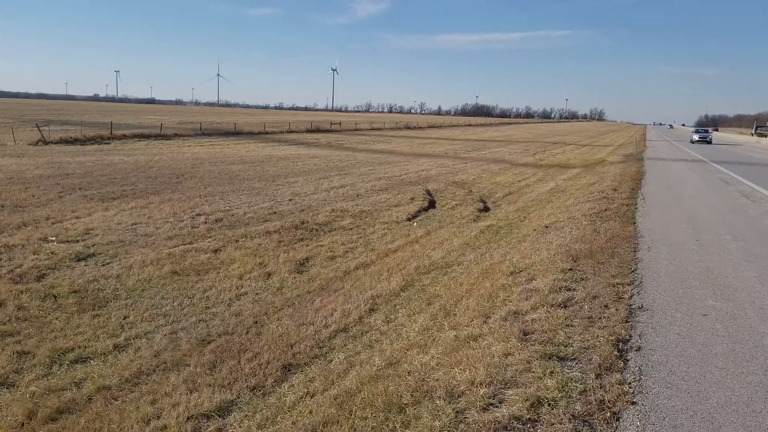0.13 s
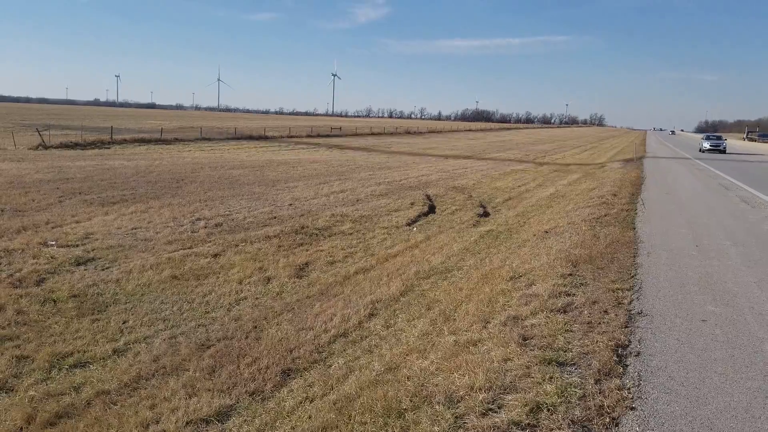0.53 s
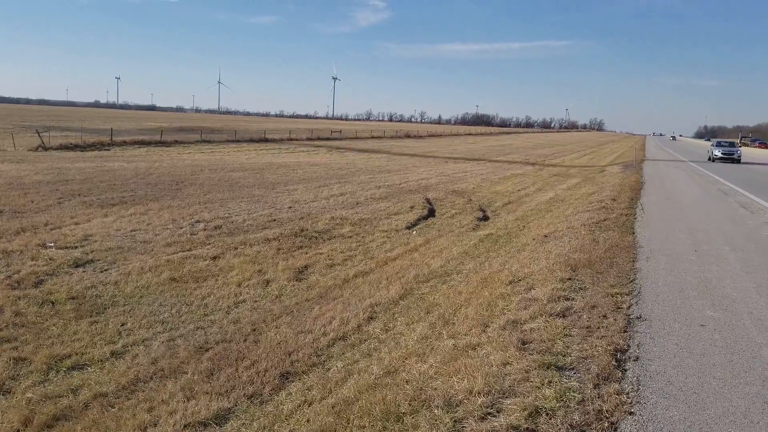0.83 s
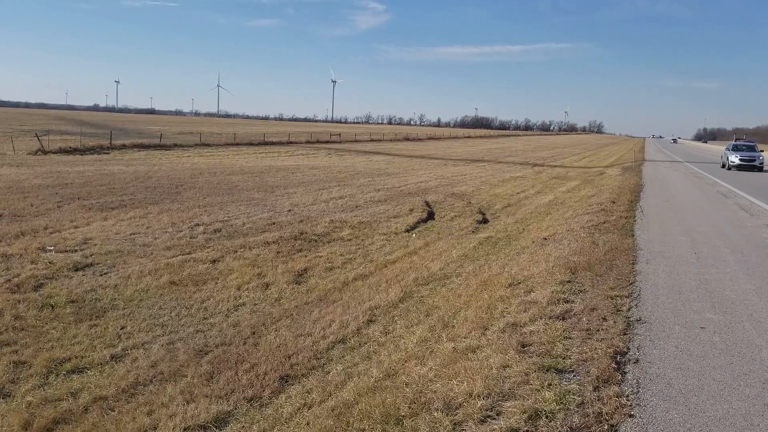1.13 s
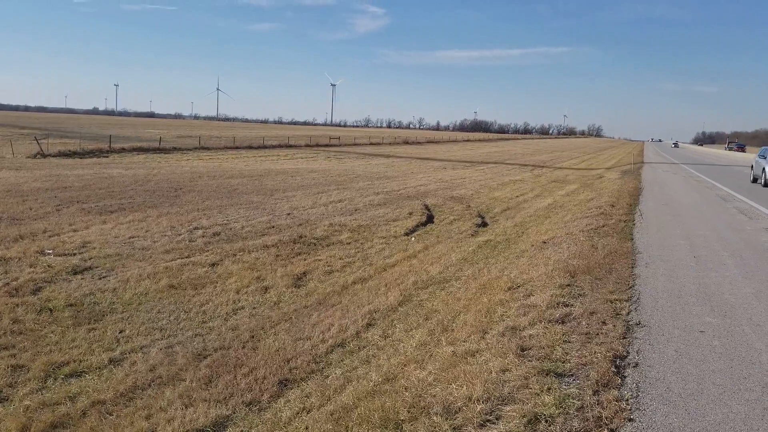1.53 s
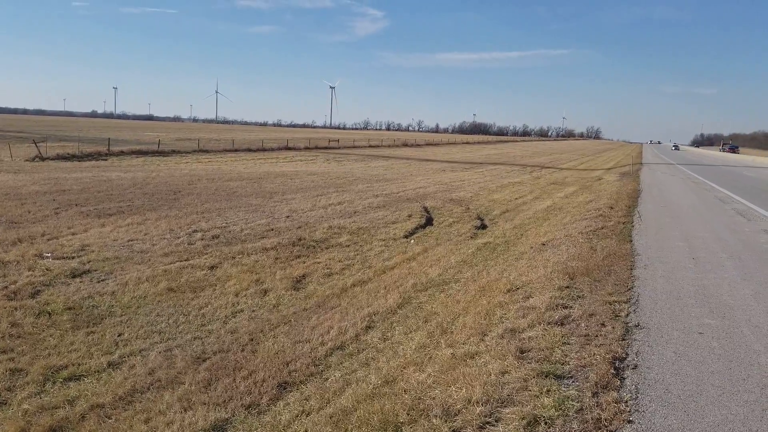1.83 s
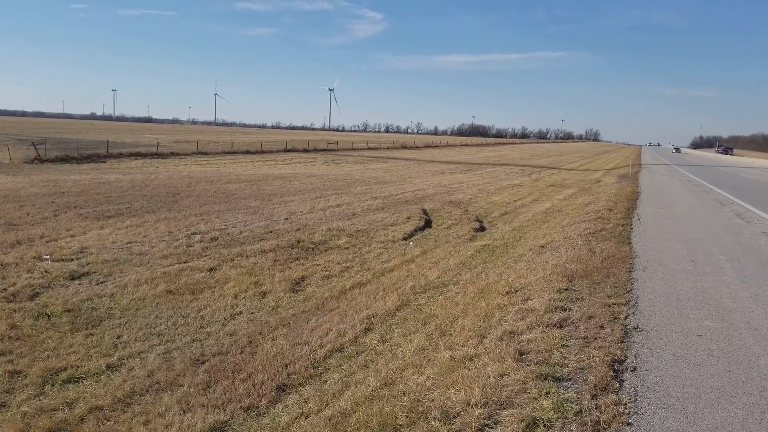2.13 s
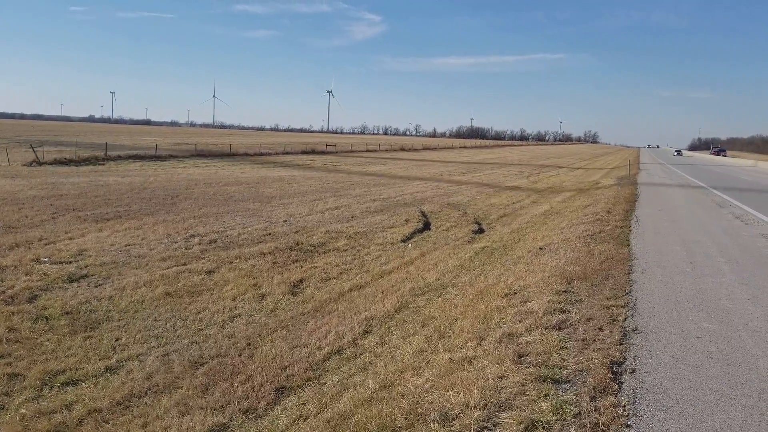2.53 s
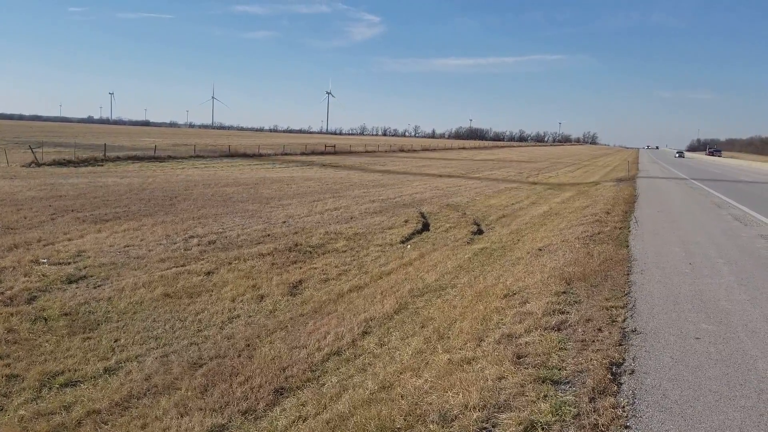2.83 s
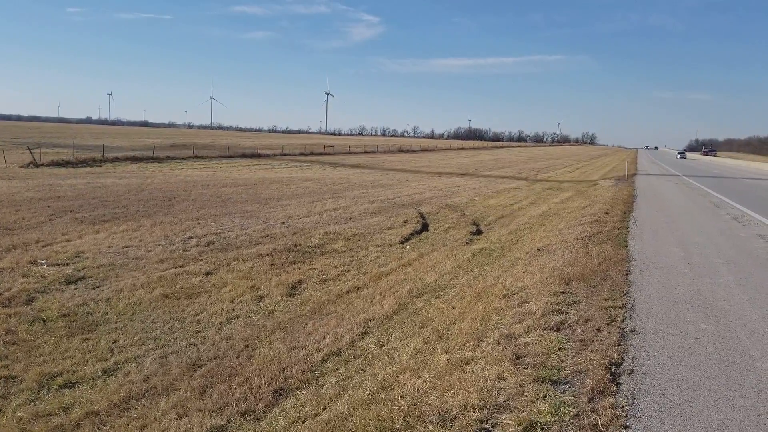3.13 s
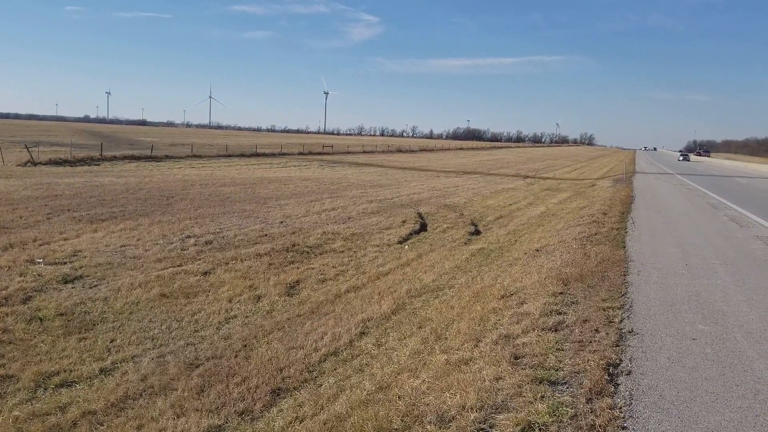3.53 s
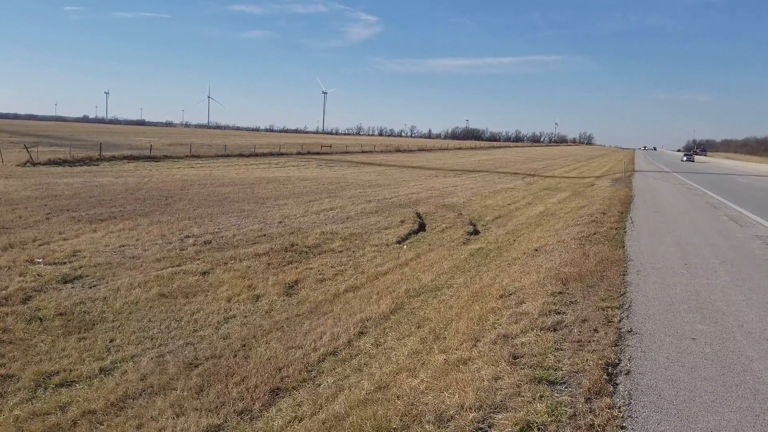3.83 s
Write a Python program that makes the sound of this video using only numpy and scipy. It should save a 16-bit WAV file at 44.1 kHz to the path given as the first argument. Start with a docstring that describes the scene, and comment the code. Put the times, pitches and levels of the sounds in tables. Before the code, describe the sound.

Cars passing on an open highway, tyre roar swelling and fading twice, with breeze thumping the microphone.

```python
"""Beside a highway: two cars pass one after the other to the right of a hand-held phone with a microphone
at each end. Their tyre roar is shaped noise that grows, brightens and drops in pitch as each goes by.
Far traffic is dull steady noise under a low unsteady drone; the breeze is lumpy low noise, with bursts of
soft pressure pushes thumping mostly on the right microphone. One tiny bright tick comes late."""
import sys
import numpy as np
from scipy import signal
from scipy.fft import rfft, irfft, next_fast_len
from scipy.io import wavfile
from scipy.ndimage import uniform_filter1d, map_coordinates

SR = 44100
rng = np.random.default_rng(int(sys.argv[2]) if len(sys.argv) > 2 else 0)


def makeup_ratio(level_db):
    """Linear amplitude ratio for a level in decibels (20 dB per factor of ten)."""
    decades = np.asarray(level_db, float) / 20
    return 10 ** decades


def master(y):
    """Save y as 16-bit WAV."""
    cut = np.clip(np.atleast_2d(y).T, -1, 1)
    pcm = np.round(cut * 32767)  # scale
    wavfile.write(sys.argv[1], SR, pcm.astype(np.int16))


N = 175518  # samples

# The passing cars; levels are before distance and unevenness:
# abeam_s, side_s (time to drive its own side distance), level_db, treble_tilt_db_per_octave, exhaust_hz, exhaust_db
PASSING_CARS = [(1.269, 0.337, -14.5, -1.5, 100.4, -27), (2.498, .22, -12.5, 0.18, 69.83, -23)]
# Mid-pitch bumps and dips in each car's roar, one list per car: centre_hz, width_hz, lift_db
ROAR_BUMPS = [
    [(550, 89, 1), (750, 75, 1), (1030, 200, -2), (1374, 127, 1)],
    [(626, 82, -3), (907, 84, 2.5), (1600, 180, 0), (2150, 210, 1)],
]
# Tyre roar colour abeam, relative: pitch_hz, density_db_per_hz
TYRE_ROAR = [(15, -42), (25, -40), (45, -14.5), (70, -6.5), (120, -1), (200, -0.5), (350, -5), (520, -6.5),
             (700, -4), (900, -4.5), (1200, -3), (1600, -6.5), (2200, -11.5), (2800, -19), (3500, -25),
             (5000, -33), (6500, -36.5), (8800, -41.5), (11000, -40.5), (12800, -43.5), (15500, -46.5)]
# Extra loss over air and ground: pitch_hz, loss_db_per_side_distance
DISTANCE_LOSS = [(100, -0.57), (300, 0.1), (520, 1.76), (850, 0.27), (1300, 0.56), (2000, 0.78),
                 (3000, 1.4), (5000, 2), (9000, 3), (15000, 9.5)]
# Gain ahead of the car, and equal loss behind it: pitch_hz, gain_db
FRONT_GAIN = [(100, 3), (500, 0.33), (900, 0), (1500, 2), (2200, 1.5), (3500, -2), (10000, 2.5)]
# Uneven level of both cars together, with sudden treble steps: time_s, level_db, bass_db, treble_db
UNEVEN_LEVEL = [(.07, -5.5, 5.5, -0.5), (.34, -0.5, -3, -11.5), (.41, -1, -0.3, 4), (.75, -0.5, -2.2, -6.5),
                (.85, -1, 0.2, -2.7), (1.1, -2.5, 2.7, 5), (1.3, 0.5, -1.2, -0.3), (1.5, -2.5, 4, 6),
                (1.65, -1, -1.5, 2.3), (1.85, 0, -1, 1.7), (2.05, -0.5, -3.7, -2.5), (2.25, -1, -2.8, -0.5),
                (2.45, -0.5, -3.5, -2.5), (2.6, 0.5, -5.2, -6), (2.75, -1.5, 1, -4), (3.0, -1.5, -3, 2),
                (3.15, -2.5, -1.5, 5.5), (3.4, -2.5, 1.8, -0.5), (3.7, 0.5, -2.3, -4.5),
                (3.98, 5.5, 1.5, -19)]
# Where each car is heard from, one list per car: time_s,
# facing (1 = in line beyond the right microphone, 0 = square on, -1 = beyond the left)
CAR_FACING = [
    [(.07, 0.58), (.7, 0.73), (1.0, 0.84), (1.2, 0.99), (1.36, 0.97), (1.55, 0.58), (1.8, 0.3), (2.2, 0.4),
     (3.98, -0.46)],
    [(.07, 0.9), (1.9, 0.65), (2.2, 0.77), (2.42, .97), (2.6, 0.84), (2.73, 0.51), (2.9, -0.06),
     (3.2, -0.21), (3.98, -0.3)],
]
# Right gain over left for a source fully ahead, reversed behind: pitch_hz, right_gain_db
BODY_SHADOW = [(200, 0.9), (1000, -1.5), (2000, 2), (4000, 0.5), (6000, 3), (8000, 7.5), (12000, 8.5),
               (15500, 12)]
# Likeness of the arrivals at the two microphones: pitch_hz, likeness (0 to 1)
ARRIVAL_LIKENESS = [(30, .5), (70, 0.66), (150, 0.99), (1000, 0.94), (2500, 0.66), (4000, 0.46), (8000, .3),
                    (15000, 0.22)]
# Far traffic colour, relative: pitch_hz, density_db_per_hz
FAR_ROAR = [(15, -42), (30, -20), (60, 12), (120, 1), (250, -6), (500, -5), (850, -5.5), (1300, -17),
            (2000, -15.5), (3000, -28), (5000, -45), (8000, -77), (15500, -98)]
# Low drone, levels before wobble: pitch_hz, level_db, wobbles_per_s
LOW_DRONE = [(63.9, -40.5, 2.46), (124.8, -35.5, 14)]
# Breeze rumble colour, relative: pitch_hz, density_db_per_hz
BREEZE_RUMBLE = [(15, -14), (30, 8.5), (60, 9), (150, 11.5), (300, -10.5), (600, -45.5)]
# Breeze rumble on the left and right microphone, before wobble: level_db
RUMBLE_DB = [-37, -41]
# Thumps on the right microphone, level before scatter: start_s, length_s, level_db
BREEZE_PUFFS = [(.53, .1, -29), (.62, .08, -12), (1.18, .1, -16), (1.3, .1, -12.5), (1.5, .05, -15),
                (1.63, .06, -12), (1.74, .1, -9.5), (1.92, .04, -21), (1.99, .06, -9.5)]
# Colour of each microphone: pitch_hz, gain_db
LEFT_COLOUR = [(200, -0.5), (400, 0.45), (530, -2), (720, 1.5), (1000, 0.45), (1450, 0.5), (2000, -1.2),
               (2700, -0.2), (3300, 0.9), (4300, -0.3), (6000, 1), (8000, 2), (8800, -5), (12000, 0.5),
               (15500, 1)]
RIGHT_COLOUR = [(200, -0.67), (400, 0), (520, -2), (720, 0.9), (1000, -0.4), (1500, 0.3), (1800, 0.4),
                (2150, 2), (2700, 0), (3300, 1.3), (4300, 0), (6200, 2), (7300, -7), (9000, -4), (10500, 0),
                (11700, -6.5), (12700, 6), (14000, 1), (15300, 4.5)]

SPEED_MACH = .085  # car speed over the speed of sound
BASS_HZ, TREBLE_HZ = 350, 4000  # corners of the uneven bass and treble
SPACING_S = 0.00051  # travel time between the microphones
FAR_DB, FAR_FACING = -31.5, -0.17
PUSHES_PER_S, PUSH_QUICKNESS_HZ, PUSH_SCATTER_DB = 70, 119, 3
PUSH_LEFT_DB = -20  # left microphone relative to right
TICK_S, TICK_DB, TICK_HZ = 3.5033, -39, 13000
START_S = .0695  # silence before this
HISS_DB, LOW_CUT_HZ, TOP_HZ = -85, 35.3, 15830


def along(points, hz):
    """Reads (Hz, value) points on a log frequency axis."""
    f, v = np.transpose(points)
    return np.interp(np.log(hz + 1), np.log(f + 1), v)


def wobble(rate):
    """A smooth random curve, rate knots a second."""
    knots = rng.standard_normal(int(N * rate / SR) + 4)
    return map_coordinates(knots, [np.arange(N) * rate / SR])


def noise_spectra():
    """Frequencies (column), times and short-time spectra of three independent noises."""
    hz, t, z = signal.stft(rng.standard_normal((3, N)), SR, nperseg=1024, noverlap=768)
    return hz[:, None], t, z


def to_sound(spectra):
    """Short-time spectra back to waveforms."""
    return signal.istft(spectra, SR, nperseg=1024, noverlap=768)[1][:, :N]


def level_of(points, hz):
    """Spectrum in dB, scaled so that white noise through it keeps rms 1."""
    every_hz = np.linspace(0, SR / 2, 2048)
    mean_power = np.mean(makeup_ratio(along(points, every_hz)) ** 2)
    return along(points, hz) - 10 * np.log10(mean_power)


def arrive(z, hz, gain_db, facing, ahead, patchy_db):
    """One source at both microphones: the far one hears it later, partly scattered; the phone's body shades treble."""
    field = rng.standard_normal(z.shape[1:])
    field = uniform_filter1d(field, size=12, axis=0)
    field = uniform_filter1d(field, size=14, axis=1)
    alike = np.clip(along(ARRIVAL_LIKENESS, hz), 0, 1)
    # half of the level and time difference goes to each side
    shade = makeup_ratio(-along(BODY_SHADOW, hz) * ahead / 2)
    delay = np.exp(-1j * np.pi * hz * SPACING_S * facing)
    left = shade * delay
    pair = (np.sqrt(alike) * z[0] + np.sqrt(1 - alike) * z[1:]) * [left, 1 / left]
    gain = makeup_ratio(gain_db + patchy_db * field / field.std())
    return to_sound(pair * gain)


def car(abeam_s, side_s, level_db, tilt_db, exhaust_hz, exhaust_db, facing, bumps):
    """Tyre roar falls with distance and slides down in pitch; the exhaust note sounds mostly from behind."""
    hz, t, z = noise_spectra()
    along_road = (t - abeam_s) / side_s
    reach = np.hypot(1, along_road)  # distance, in side distances
    bearing = np.arctan(along_road)  # negative while approaching
    shift = 1 / (1 + SPEED_MACH * np.sin(bearing))  # Doppler pitch ratio

    colour_db = level_of(TYRE_ROAR, hz / shift) + tilt_db * np.log2(1 + hz / 1000)
    bumps_db = sum(lift_db * np.exp(-((hz / shift - centre) / width) ** 2)
                   for centre, width, lift_db in bumps)
    distance_db = -20 * np.log10(reach) - along(DISTANCE_LOSS, hz) * (reach - 1)
    front_db = -along(FRONT_GAIN, hz) * np.sin(bearing)
    s, overall_db, bass_db, treble_db = np.transpose(UNEVEN_LEVEL)
    treble_share = hz ** 2 / (hz ** 2 + TREBLE_HZ ** 2)
    bass_share = BASS_HZ ** 2 / (hz ** 2 + BASS_HZ ** 2)
    uneven_db = (np.interp(t, s, overall_db) + np.interp(t, s, treble_db) * treble_share
                 + np.interp(t, s, bass_db) * bass_share)
    gain_db = level_db + colour_db + bumps_db + distance_db + front_db + uneven_db
    heard_from = np.interp(t, *np.transpose(facing))
    roar = arrive(z, hz, gain_db, heard_from, -np.sin(bearing), patchy_db=1.5)

    now = np.arange(N) / SR
    pitch_hz = exhaust_hz * np.interp(now, t, shift) * (1 + 0.0393 * wobble(14))
    phase = 2 * np.pi * np.cumsum(pitch_hz) / SR
    # opens towards the rear of the car, fades with distance
    behind = np.interp(now, t, 1 / (1 + np.exp(-6 * (bearing + 0.33))) / reach ** 1.03)
    note = np.sin(phase) + makeup_ratio(-9 + 2.4 * wobble(8)) * np.sin(2 * phase)
    return roar + np.sqrt(2) * makeup_ratio(exhaust_db + 3.1 * wobble(5.75)) * behind * note


def far_traffic():
    """A dull steady roar from down the road and a low drone of tones with randomly wandering strength and phase."""
    hz, t, z = noise_spectra()
    steady_db = FAR_DB + level_of(FAR_ROAR, hz) + 0 * t
    roar = arrive(z, hz, steady_db, FAR_FACING, -.5, patchy_db=0.0)
    now = np.arange(N) / SR
    drone = np.zeros(N)
    for pitch_hz, level_db, rate in LOW_DRONE:
        turn = 2 * np.pi * pitch_hz * now
        drone += makeup_ratio(level_db) * (wobble(rate) * np.sin(turn) + wobble(rate) * np.cos(turn))
    return roar + drone


def breeze():
    """Lumpy rumble apart on each microphone, and bursts of soft pressure pushes mostly on the right one."""
    hz, t, z = noise_spectra()
    rumble = to_sound(z[1:] * makeup_ratio(level_of(BREEZE_RUMBLE, hz)))
    lumps = np.array([wobble(4), wobble(13)])
    rumble = rumble * makeup_ratio(np.array(RUMBLE_DB)[:, None] + 4.8 * lumps)
    pushes = np.zeros(N)
    u = np.arange(-400, 900) / SR
    draws = rng.standard_normal((len(BREEZE_PUFFS), 12, 3))
    for (start_s, length_s, level_db), rows in zip(BREEZE_PUFFS, draws):
        for k, (late, size, quickness) in enumerate(rows):
            at = (k + .5 + 0.268 * late) / PUSHES_PER_S
            w = 2 * np.pi * PUSH_QUICKNESS_HZ * np.exp(.25 * quickness) * u
            # a push, then a broader pull
            push = np.exp(-w ** 2) - 0.99 * np.exp(-(w - 2.4) ** 2 / 3.3)
            push = push * (at < length_s)  # none once the puff is over
            first = round((start_s + at) * SR) - 400
            pushes[first:][:len(u)] += makeup_ratio(level_db + PUSH_SCATTER_DB * size) * push
    return rumble + pushes * makeup_ratio([[PUSH_LEFT_DB], [0]])


def tick():
    """One tiny bright tick close to the phone: a very short tone burst, 7 dB weaker on the right."""
    u = np.arange(N) / SR - TICK_S
    burst = np.exp(-(u / .00008) ** 2) * np.cos(2 * np.pi * TICK_HZ * u)
    return makeup_ratio(TICK_DB) * burst * makeup_ratio([[0], [-7]])


def scene():
    """Cars, far traffic, breeze and the tick, added up at the two microphones."""
    cars = sum(car(*row, facing, bumps)
               for row, facing, bumps in zip(PASSING_CARS, CAR_FACING, ROAR_BUMPS))
    return cars + far_traffic() + breeze() + tick()


def low_pass(x):
    """Removes everything above the highest recorded frequency."""
    return signal.sosfilt(signal.butter(12, 16620, fs=SR, output="sos"), x)


def record(dry):
    """Faint hiss, microphone colour, low cut and band limit; the sound starts after a moment of silence."""
    hiss = makeup_ratio(HISS_DB) * rng.standard_normal(dry.shape)
    m = next_fast_len(N)
    hz = np.fft.rfftfreq(m, 1 / SR)
    colour = makeup_ratio([along(LEFT_COLOUR, hz), along(RIGHT_COLOUR, hz)])
    low_cut = hz ** 2 / np.hypot(hz ** 2, LOW_CUT_HZ ** 2)
    response = colour * low_cut * (hz < TOP_HZ)
    heard = irfft(rfft(dry + hiss, m) * response, m)[:, :N]
    started = np.arange(N) >= START_S * SR
    return low_pass(heard * started)


dry = scene()
out = record(dry)
master(out)
```